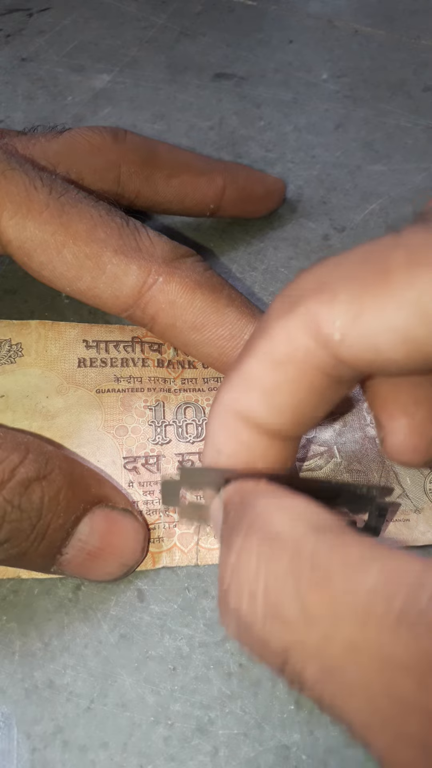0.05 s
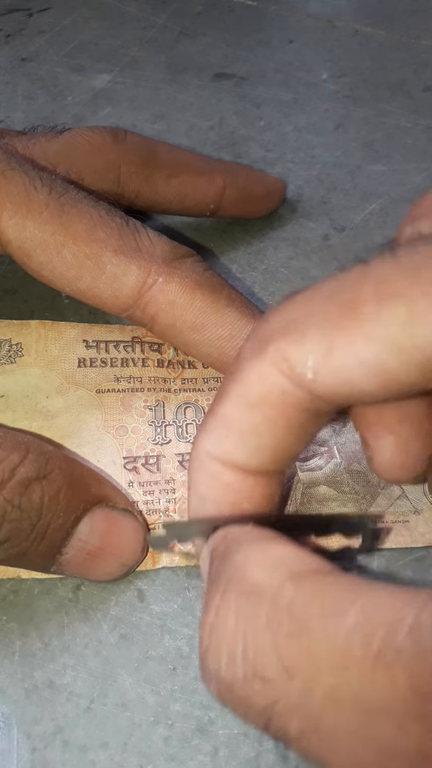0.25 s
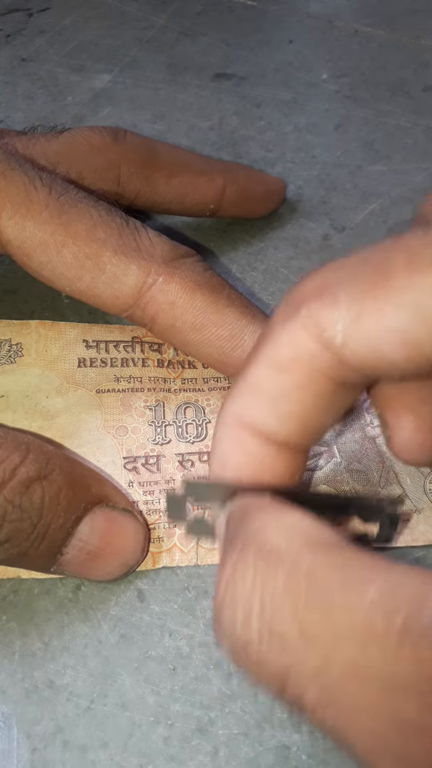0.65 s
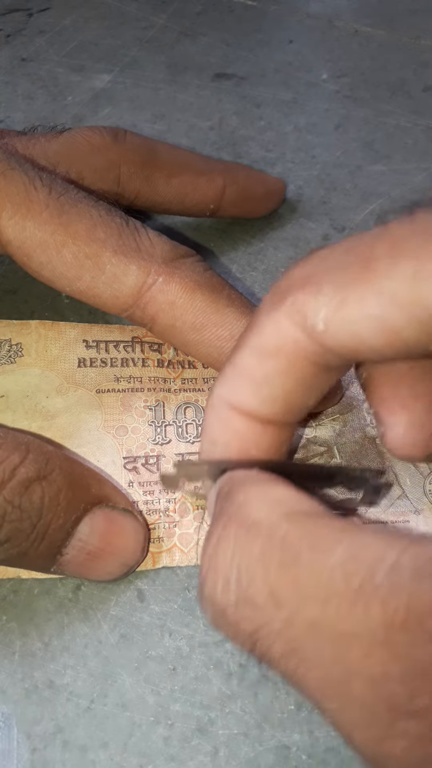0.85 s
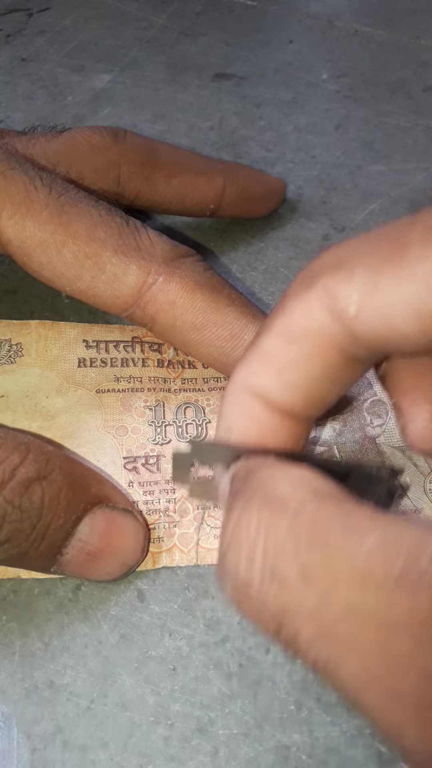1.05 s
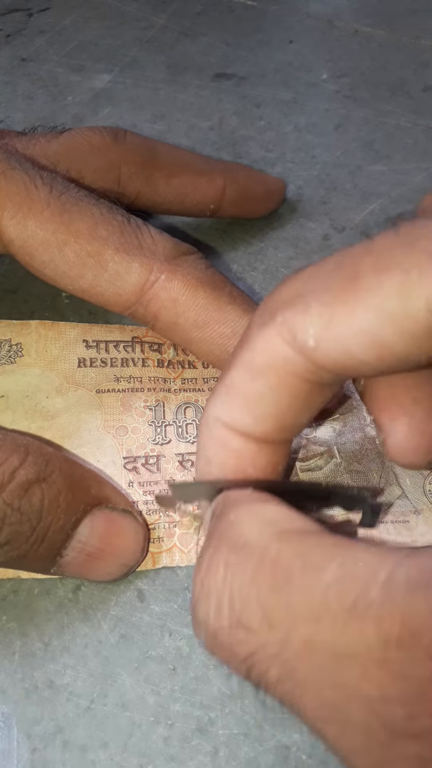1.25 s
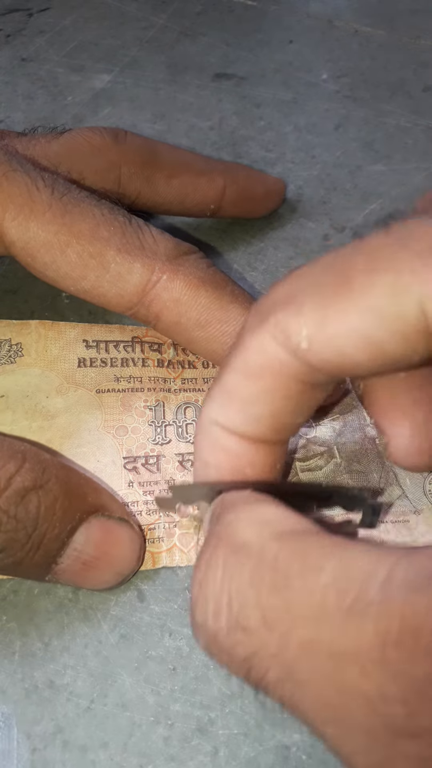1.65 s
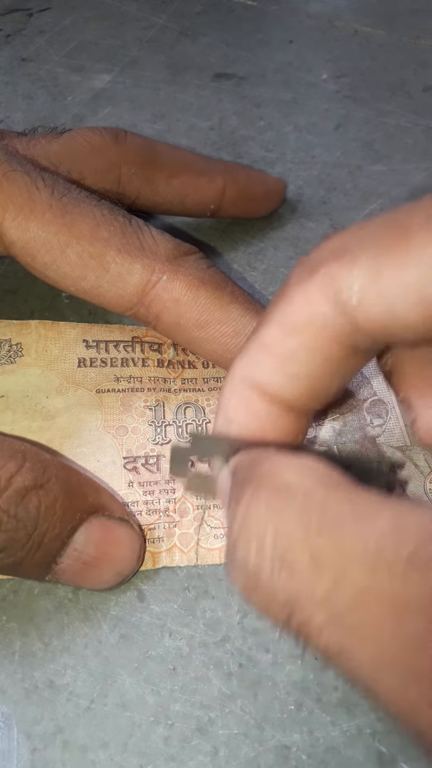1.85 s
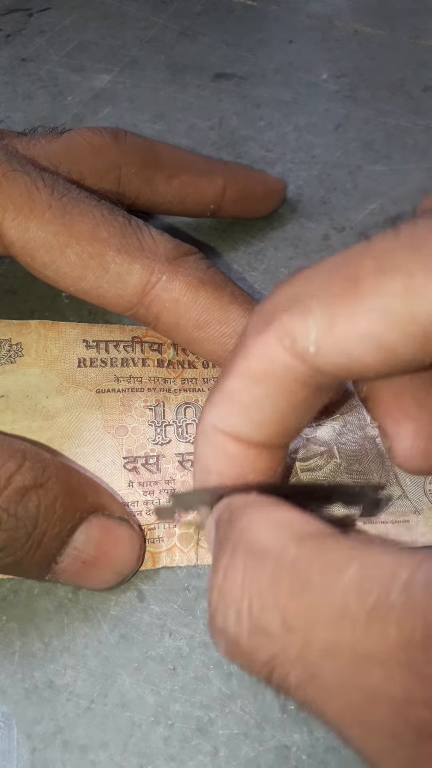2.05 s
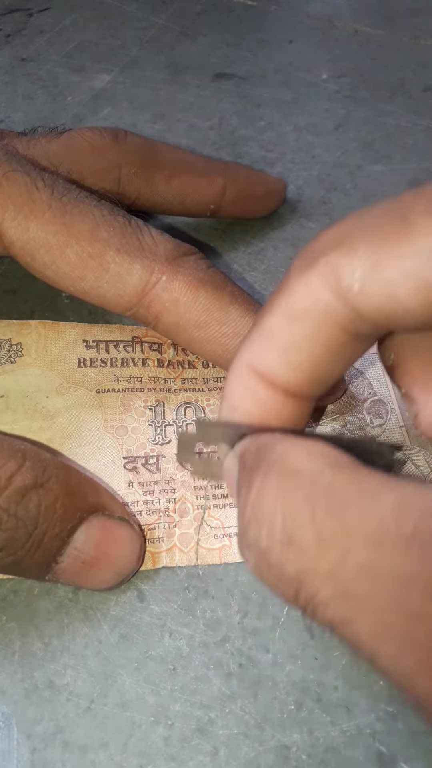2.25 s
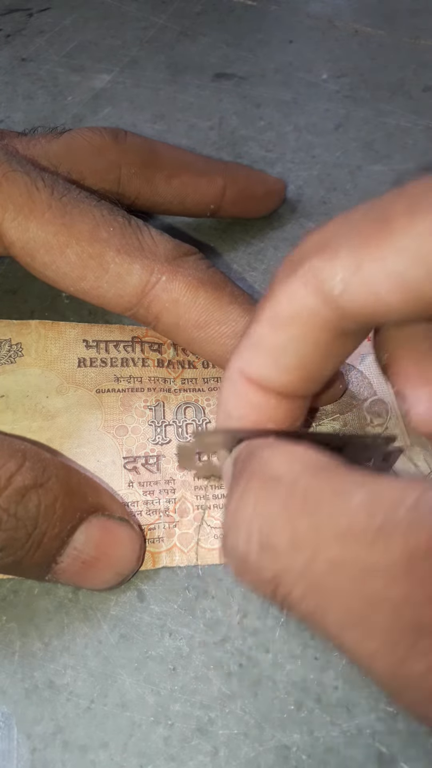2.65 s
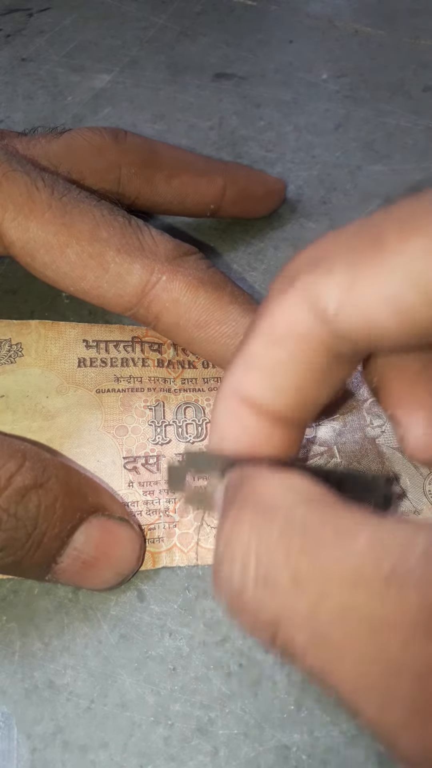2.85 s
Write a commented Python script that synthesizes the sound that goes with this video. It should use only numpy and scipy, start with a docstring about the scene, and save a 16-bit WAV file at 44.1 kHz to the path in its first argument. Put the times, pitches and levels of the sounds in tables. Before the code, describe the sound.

A razor blade scrapes a paper banknote in eight quick, dry strokes with sharp clicks.

```python
"""Razor blade scraping a banknote

A razor blade scrapes a banknote on a stone top in eight quick strokes, close to the microphone.
The edge catches with a bright tick, paper fibres snag and ring the thin steel, and the blade knocks
on the stone as each stroke ends. A small hard room answers faintly over a low background rumble."""
import sys
import numpy as np
from scipy import signal
from scipy.fft import rfft, irfft
from scipy.io import wavfile
from scipy.ndimage import uniform_filter1d

SR = 44100
rng = np.random.default_rng(int(sys.argv[2]) if len(sys.argv) > 2 else 0)


def unload_wav(signal):
    """Save mono or channel-first audio to the path in sys.argv[1] as 16-bit WAV at rate SR, clipped to [-1, 1]."""
    wavfile.write(
        sys.argv[1],
        SR,
        np.round(np.clip(np.atleast_2d(signal).T, -1, 1) * 32767).astype(np.int16),
    )


N = 132300
TOP_HZ = 16100  # upper limit of the treble


def amp(db):
    """Turns decibels into a gain."""
    return 10 ** (np.asarray(db) / 20)


def unit_rms(x):
    """Scales a sound to an average (rms) level of 1."""
    return x / np.sqrt(np.mean(x ** 2) + 1e-20)


def unit_burst(x):
    """Scales a short sound to the energy of 5 ms at rms 1."""
    return x * np.sqrt(.005 * SR / np.sum(x ** 2))


def curve_at(points, hz):
    """Reads between the points of a table, on a log frequency scale."""
    f, value = np.transpose(points)
    return np.interp(np.log(hz + 1), np.log(f + 1), value)


def place(events):
    """Mixes (start time, sound) pairs into one track."""
    track = np.zeros(N)
    for start, sound in events:
        part = track[max(round(start * SR), 0):][:len(sound)]
        part += sound[:len(part)]
    return track


def causal(log_gain):
    """Turns a two-sided spectrum of log gains into a ring that follows its trigger."""
    return np.fft.ifft(np.exp(signal.hilbert(log_gain).conj())).real[:len(log_gain) // 2]


# The tone of the background: f/Hz, relative level/dB
RUMBLE_COLOUR = [(22, -29.5), (42, -16.5), (70, -1.5), (115, -0.5), (170, -7.5), (280, -3), (380, -18.5),
                 (600, -6), (830, -2), (1200, -34.5), (3100, -31.5), (9000, -42.5), (16000, -35)]
def background(level_db=-58.5):
    """Steady low rumble with a trace of hiss."""
    gain = amp(curve_at(RUMBLE_COLOUR, np.fft.rfftfreq(N, 1 / SR)))
    return amp(level_db) * unit_rms(irfft(rfft(rng.standard_normal(N)) * gain, N))


# The notes the steel rings at: f/Hz, width/Hz, boost/dB
BLADE_RESONANCES = [(2790, 300, 8), (3200, 380, 7), (4230, 450, 7), (5400, 200, 4), (5840, 200, 13),
                    (6260, 140, 6), (6650, 150, 10), (7990, 210, 16), (8290, 190, 10), (8950, 500, 7),
                    (11400, 400, 5), (12700, 800, 6), (14400, 600, 5), (15550, 400, 6)]
# Narrow dips between those notes: f/Hz
BLADE_DIPS = [5050, 6420, 7220, 10100, 13900]
def blade_ring(*colours, favoured=(), favour_db=5.5, favour_width_hz=410, dip_db=-2):
    """The blade's ring after one tiny tug; the point of contact can favour one range of pitch."""
    hz = abs(np.fft.fftfreq(4096, 1 / SR))
    peaks = sum((amp(db) ** 2 - 1) / (1 + (2 * (hz - f) / width) ** 2) ** 2
                for f, width, db in BLADE_RESONANCES)
    shape_db = sum(curve_at(colour, hz) for colour in colours)
    shape_db += sum(dip_db * np.exp(-((hz / f - 1) / .02) ** 2) for f in BLADE_DIPS)
    shape_db += sum(favour_db * np.exp(-((hz - f) / favour_width_hz) ** 2) for f in favoured)
    ring = causal(np.log(amp(shape_db)) + .5 * np.log(np.maximum(1 + peaks, .1)))
    return ring / np.linalg.norm(ring)


def contact_force(t, fade, rise_s=.0003):
    """A burst of tiny random pushes, evened out so that it stirs all the blade's notes alike."""
    force = rng.choice([-1, 1], len(t)) * np.minimum(t / rise_s, 1) * fade
    power = uniform_filter1d(abs(np.fft.fft(force)) ** 2, 15, mode="wrap")
    return signal.fftconvolve(force, causal(-.5 * np.log(power + 1e-12)))


def band(x, lo_hz, hi_hz, order):
    """Keeps the sound between two frequencies."""
    return signal.sosfilt(signal.butter(order, [lo_hz, hi_hz], "band", fs=SR, output="sos"), x)


# The dull thud of the pinched blade on stone: f/Hz, relative level/dB, time to fade 60 dB/s
THUD_NOTES = [(795, 13, 0.022), (633, 8.5, .014), (588, -13, 0.0053)]
# Where the clack, ring and tick ranges begin: f/Hz
CLICK_BANDS = [960, 4390, 11500]
def click(colour, thud_db, clack_db, ring_db, tick_db, decay_s, favoured_hz):
    """A short buzzing contact rings the steel over a dull thud."""
    t = np.arange(2048) / SR
    rattle = amp(-24.5) * np.exp(-t / 0.0086)
    force = contact_force(t, np.exp(-t / decay_s) + rattle)
    steel = signal.fftconvolve(force, blade_ring(colour, favoured=[favoured_hz]))[:len(t)]
    thud = sum(amp(db - 60 * t / t60) * np.sin(2 * np.pi * hz * t) for hz, db, t60 in THUD_NOTES)
    thud *= np.minimum(t / 0.0027, 1)
    edges = [*CLICK_BANDS, TOP_HZ]
    parts = [thud] + [band(steel, lo, hi, order=6) for lo, hi in zip(edges, edges[1:])]
    return sum(amp(db) * unit_burst(part) for db, part in zip((thud_db, clack_db, ring_db, tick_db), parts))


# The tone of a knock: f/Hz, relative level/dB
STONE_COLOUR = [(1300, -12), (1850, -6), (2250, -8), (2750, 2.5), (4300, 1.5), (5100, -3), (6600, 8),
                (7700, 5), (9500, -15.5), (15500, -11)]
# Knocks: t/s, thud/dB, clack/dB, ring/dB, tick/dB, decay/s, favoured f/Hz
STONE_KNOCKS = [(.0075, -51.5, -44, -49.5, -61, 0.00086, 4260),
                (.0272, -35.5, -40, -50, -67, 0.00017, 2980), (.048, -41, -43, -55, -61, 0.00014, 2870),
                (.3087, -30.5, -16, -20, -30.5, 0.001, 4360),
                (.328, -44.5, -33.5, -26.5, -39, 0.0037, 6860), (.6286, -27, -25, -28, -46, 0.0018, 3350),
                (1.005, -45.5, -35, -38, -46.5, 0.0019, 3010),
                (1.3893, -33.5, -39.5, -45, -60, 0.00092, 2850),
                (1.7997, -30, -30, -37.5, -55, 0.002, 3250), (2.1643, -30, -21.5, -21, -34.5, 0.001, 6750),
                (2.235, -44, -40, -48, -57, 0.0018, 4170),
                (2.5013, -27.5, -25.5, -29.5, -40.5, 0.0029, 3180),
                (2.817, -30, -38.5, -49, -67, 0.0019, 2830)]
def knocks():
    """The blade knocks on the stone."""
    return place((start, click(STONE_COLOUR, *row)) for start, *row in STONE_KNOCKS)


def snap(ring, decay_s=0.002):
    """A clump of paper fibres lets go of the edge at once."""
    t = np.arange(2048) / SR
    return unit_burst(signal.fftconvolve(contact_force(t, np.exp(-t / decay_s)), ring))


# The tone of a flick: f/Hz, relative level/dB
LIGHT_COLOUR = [(2000, -8.5), (7500, -6.5), (9300, 3), (11500, -9)]
# Flicks: t/s, level/dB
PAPER_FLICKS = [(.071, -47), (.131, -52.5), (.482, -53), (.829, -52.5), (1.184, -59), (2.678, -50.5),
                (2.964, -54)]
def flicks():
    """The paper flicks lightly against the blade between strokes."""
    ring = blade_ring(LIGHT_COLOUR)
    return place((start, amp(db) * snap(ring)) for start, db in PAPER_FLICKS)


# The tone of a catch: f/Hz, relative level/dB
EDGE_COLOUR = [(1300, -20), (2200, -11.5), (3000, -6), (5100, 3), (6400, -9.5), (10000, -6), (15500, 0.5)]
# Catches: t/s, thud/dB, clack/dB, ring/dB, tick/dB, decay/s, favoured f/Hz
EDGE_CATCHES = [(.0855, -48, -43.5, -39, -54, 0.0052, 7800),
                (1.5895, -42.5, -49.5, -40.5, -45.5, 0.0023, 4700),
                (1.608, -33, -36.5, -33, -41, 0.0011, 4940), (1.6286, -43, -28, -27.5, -30, 0.0007, 5000),
                (2.3758, -34.5, -28.5, -26.5, -38, 0.0021, 4900),
                (2.7156, -30.5, -27, -18, -23.5, 0.001, 7930)]
def catches():
    """The edge catches on the paper with a bright tick."""
    return place((start, click(EDGE_COLOUR, *row)) for start, *row in EDGE_CATCHES)


def fibre_drag(t, fibres_per_s=11000, spread_db=2.7, slips_per_s=210, slip_s=0.002):
    """Tiny fibres snap past the edge, harder in uneven jerks as it sticks and slips."""
    fibres = (rng.random(len(t)) < fibres_per_s / SR) * rng.choice([-1, 1], len(t))
    fibres = fibres * amp(spread_db * np.minimum(rng.exponential(1, len(t)), 4))
    gaps, sizes = rng.standard_normal((2, 60))
    age = t[:, None] - t[0] - np.cumsum(np.exp(0.7 * gaps)) / slips_per_s
    jerks = ((age > 0) * np.exp(-abs(age) / slip_s + 0.47 * sizes)).sum(1)
    return unit_rms(fibres * (1 + 0.8 * jerks))


# The tone of steel on paper: f/Hz, relative level/dB
PAPER_COLOUR = [(40, -40), (200, -16.5), (370, -16.5), (620, 0), (800, 11.5), (960, 4), (1100, -16.5),
                (1300, -28), (1900, -23), (2250, -18.5), (2800, -10), (4600, -0.5), (7400, -1),
                (10200, -9.5), (12400, -6), (15500, -11)]
# How that tone dulls as the blade tilts: f/Hz, change/dB
TILT_COLOUR = [(900, -5), (1800, 15), (3000, 6.5), (5500, -4), (14000, -6.5)]
# Strokes: bite t/s, length/s, level/dB, pressure peak/fraction of length, sag/dB,
# finger rub/dB, brush before the bite/relative dB, extra sizzle/dB
SCRAPE_STROKES = [(0.216, 0.12, -33, 0.42, -21.5, -61, -10, -1.5),
                  (0.513, 0.096, -33, 0, -11.5, -60, -11, 1.5),
                  (0.844, 0.17, -33.5, 0.53, -23.5, -65, -24, -1.5),
                  (1.2, 0.18, -37, 0.13, -13, -77, -20, -0.5), (1.597, 0.21, -41, 0.45, -16, -63, -6.5, -1),
                  (2.016, 0.13, -33, 0.78, -21.5, -52.5, -12.5, -.5),
                  (2.374, 0.11, -34, 0.45, -10.5, -70, -22, 4.5),
                  (2.708, 0.11, -31, 0.59, -15.5, -62.5, -11, 1.5)]
def strokes(brush_s=0.029, bite_s=.004, release_s=0.0082, build_db=-3.5, skid_db=7, skid_s=0.0061):
    """The edge brushes the paper, bites and scrapes; the pressure builds and sags as the tone dulls."""
    t = np.arange(int(.3 * SR)) / SR - brush_s
    events = []
    for start, length, level_db, peak, sag_db, rub_db, brush_db, sizzle_db in SCRAPE_STROKES:
        progress = np.clip(t / length, 0, 1)
        peak = np.clip(peak, .01, .95)
        build = build_db * np.maximum(1 - progress / peak, 0)
        sag = sag_db * (np.maximum(progress - peak, 0) / (1 - peak)) ** 1.07
        skid = skid_db * np.exp(-(1 - progress) * length / skid_s)  # digs in again just before the end
        pressure = amp(build + sag + skid)
        contact = np.clip(t / bite_s, 0, 1) * np.exp(-np.maximum(t - length, 0) / release_s)
        brush = amp(brush_db) * (t < bite_s) * np.sqrt(abs(1 + t / brush_s))
        drag = fibre_drag(t) * pressure * (contact + brush)
        sizzle = [(6750, 0), (10800, sizzle_db)]  # f/Hz, change/dB
        fresh = blade_ring(PAPER_COLOUR, sizzle, favoured=[rng.uniform(4000, 5300)])
        dull = blade_ring(PAPER_COLOUR, sizzle, TILT_COLOUR)
        scrape = signal.fftconvolve(drag * (1 - progress), fresh)
        scrape += signal.fftconvolve(drag * progress, dull)
        fingers = unit_rms(band(rng.standard_normal(len(t)), 141, 337, order=2))
        rub = fingers * contact * np.sqrt(pressure)  # the fingers drag along with the blade
        events.append((start - brush_s, amp(level_db) * scrape[:len(t)] + amp(rub_db) * rub))
    return place(events)


# Snags: t/s, level/dB
PAPER_SNAGS = [(.2085, -36), (.2235, -29), (.2365, -27.5), (.2455, -32), (.2585, -28.5), (.3028, -35.5),
               (.851, -30), (.8995, -29), (.922, -32), (1.212, -39), (2.013, -32.5), (2.0605, -31.5),
               (2.0705, -31.5), (2.080, -27.5), (2.117, -32), (2.698, -36)]
def snags():
    """The edge snags on the paper during a stroke."""
    ring = blade_ring(PAPER_COLOUR)
    return place((start, amp(db) * snap(ring)) for start, db in PAPER_SNAGS)


# How long the room rings: f/Hz, time to fade 60 dB/s
ROOM_FADE = [(300, 0.47), (800, 0.42), (3000, 0.37), (4400, 0.62), (7000, 0.56), (15000, 0.45)]
def room(x, level_db=-23, rise_s=0.0044):
    """Echoes blur into a faint tail, each range of pitch dying at its own speed."""
    hz, t, noise = signal.stft(rng.standard_normal(SR), SR, nperseg=256)
    fade = amp(-60 * t / curve_at(ROOM_FADE, hz)[:, None])
    tail = signal.istft(noise * fade, SR, nperseg=256)[1]
    tail *= np.minimum(np.arange(len(tail)) / SR / rise_s, 1)
    return amp(level_db) * signal.fftconvolve(x, tail / np.linalg.norm(tail))[:N]


def scene():
    """All the blade's sounds, their echo and the rumble, in one channel."""
    blade = strokes() + catches() + knocks() + snags() + flicks()
    return (blade + room(blade) + background())[None]


def record(dry):
    """Cuts off the very highest treble."""
    low_pass = signal.firwin(511, TOP_HZ, window=("kaiser", 9), fs=SR)
    return signal.oaconvolve(dry, low_pass[None], "same")


dry = scene()
out = record(dry)
unload_wav(out)
```